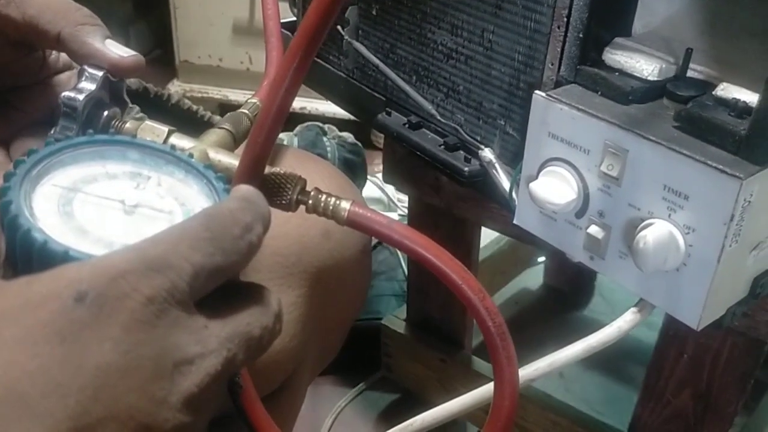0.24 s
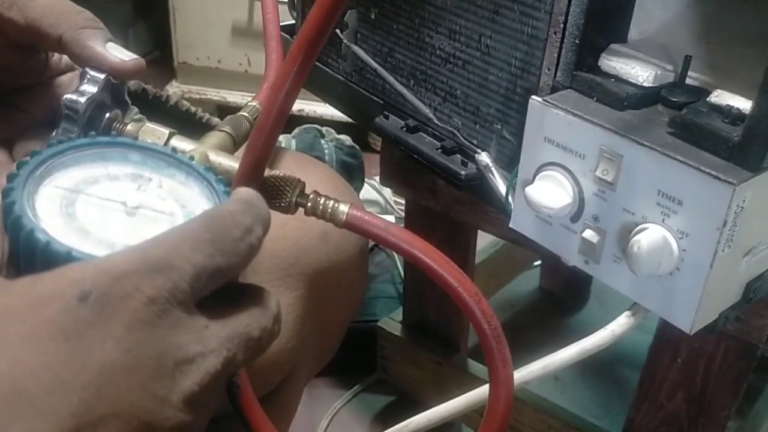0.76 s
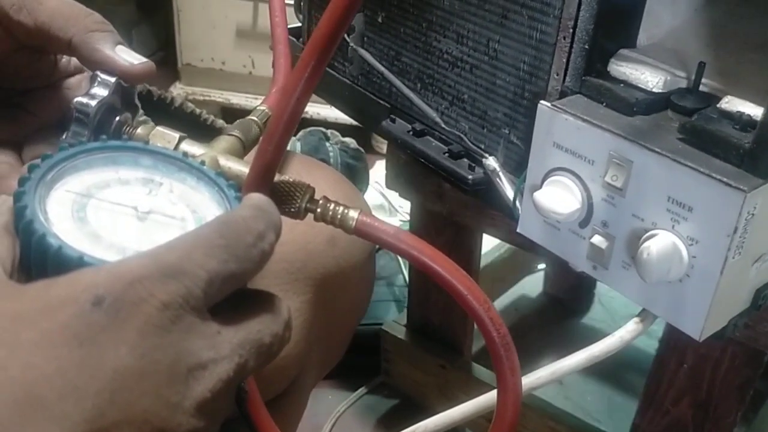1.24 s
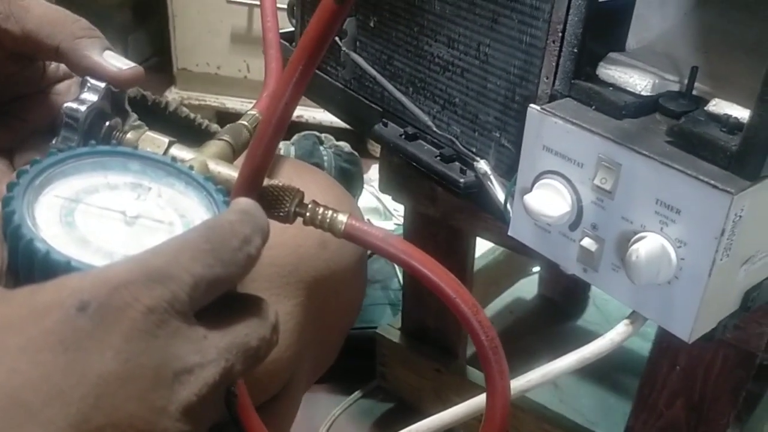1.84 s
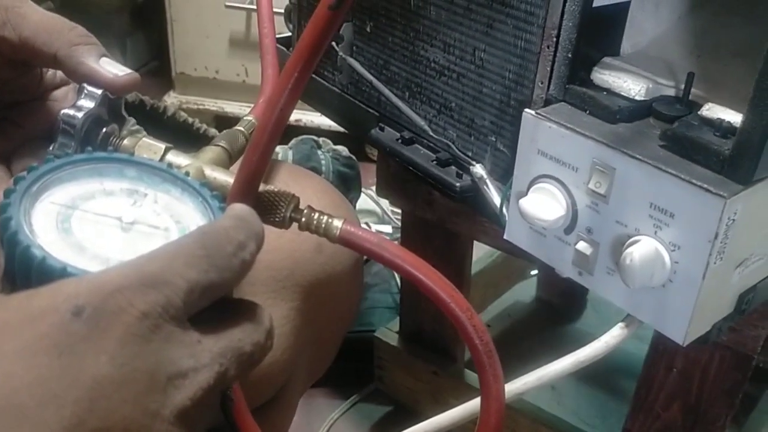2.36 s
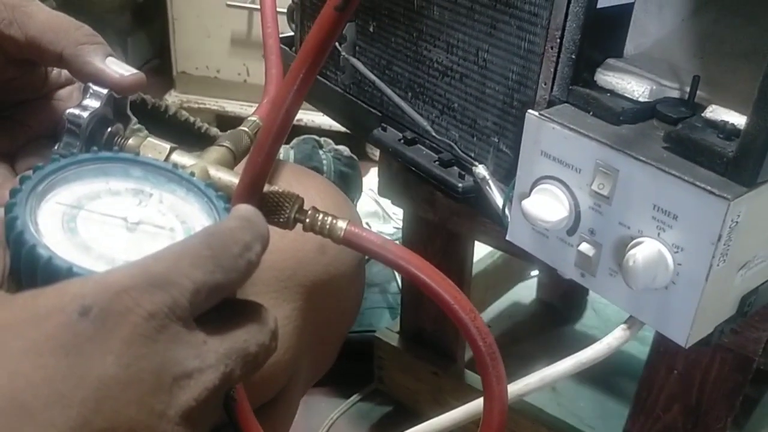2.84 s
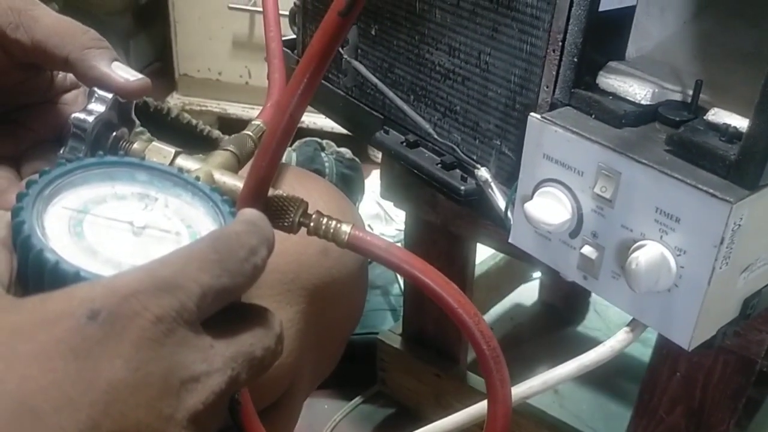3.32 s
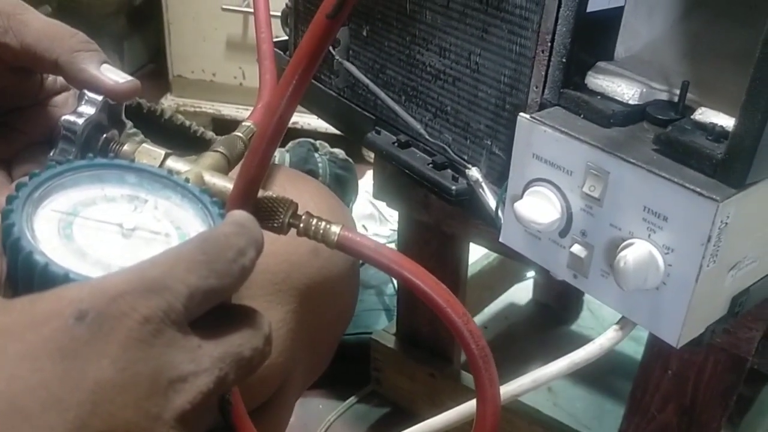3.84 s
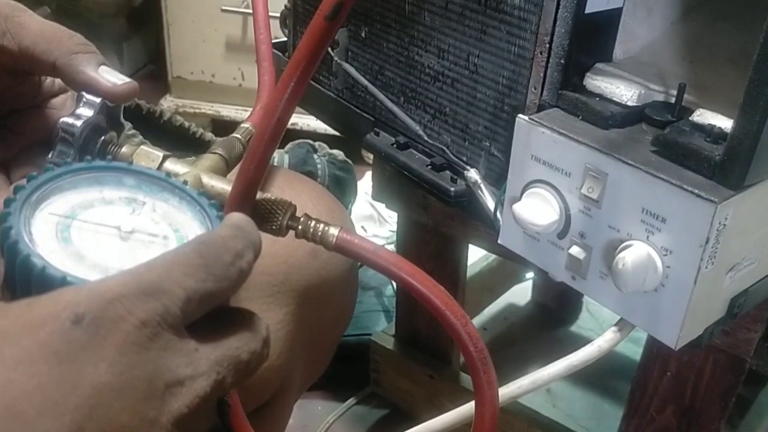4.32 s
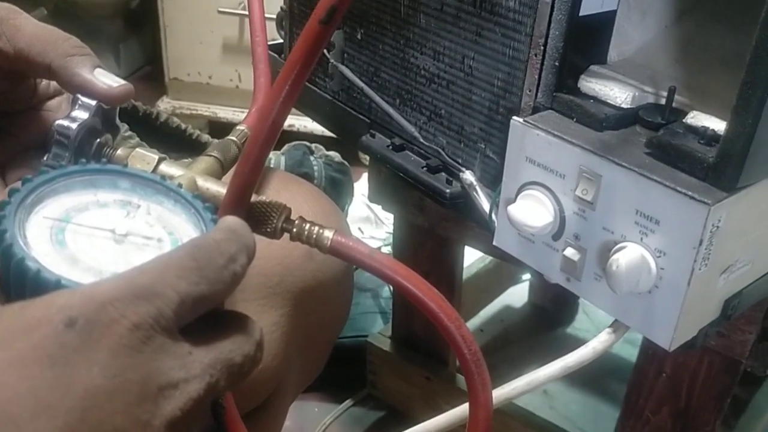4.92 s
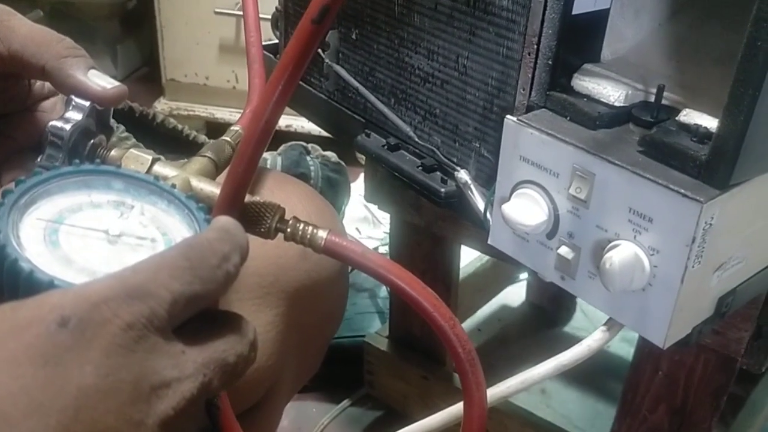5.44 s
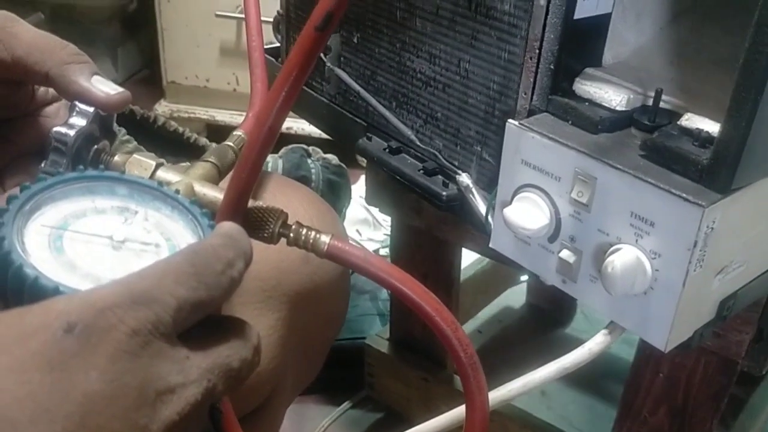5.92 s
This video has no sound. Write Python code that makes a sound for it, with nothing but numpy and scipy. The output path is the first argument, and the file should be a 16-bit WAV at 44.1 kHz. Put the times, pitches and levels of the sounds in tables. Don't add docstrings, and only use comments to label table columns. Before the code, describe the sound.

From 0 to about 6 seconds an opened-up air conditioner runs without a break in a room, a phone held near its fan. Low turbulent wind dominates: rumbling pushes, fluttering puffs and abrupt, slightly distorted pops, irregular and several a second. Strong hits come near 0.5, then a hard membrane snap at 0.7, with more around 1.5, 2.1, 2.3, 2.8, 3.4, 4.5, 4.7, 4.85, 5.9 and 6.1. The level dips for a moment after the hardest ones. Short lulls near 2.4, 3.6, 4.2, 5.4 and 6.0 uncover the machine: a steady, wavering compressor hum around 1 kHz with fainter higher tones, smooth rushing coil air, and thin refrigerant hiss with a very high sputtering whistle, sinking briefly near 3.7 and 4.3. Faint breathy fin whistles pass near 0.65, 1.8 and 5.4. It ends still running.

```python
import sys
import numpy as np
from scipy import signal
from scipy.fft import rfft, irfft
from scipy.io import wavfile
from scipy.ndimage import uniform_filter1d

SR = 44100
rng = np.random.default_rng(int(sys.argv[2]) if len(sys.argv) > 2 else 0)


def generate_wav(sig):
    pcm = np.round(np.clip(np.atleast_2d(sig).T, -1, 1) * 32767).astype(np.int16)
    wavfile.write(sys.argv[1], SR, pcm)


def voltage_ratio(decibels):
    exponent = np.asarray(decibels, float) / 20
    return 10 ** exponent


N = 272260
T = np.arange(N) / SR
SHAFT_HZ = 58.644


def evened(x):
    return x / np.sqrt(np.mean(x ** 2) + 1e-20)


def noise(points):
    hz = np.fft.rfftfreq(N, 1 / SR)
    f, db = np.transpose(points)
    shape = voltage_ratio(np.interp(np.log(hz + 1), np.log(f + 1), db, left=-99, right=-99))
    return evened(irfft(rfft(rng.standard_normal(N)) * shape, N))


def wander(hz):
    return noise([(.3, 0), (hz, 0), (3 * hz, -30)])


def humps(rows):
    return sum(db * np.exp(-((T - s) / (length / 2)) ** 2) for s, db, length in rows)


def resonate(x, hz, width):
    turn = np.exp(2j * np.pi * np.cumsum(hz * np.ones(N)) / SR)
    r = np.exp(-np.pi * width / SR)
    smooth = signal.lfilter([1], np.convolve([1, -r], [1, -r]), x / turn)
    return evened((turn * smooth).real)


# (frequency [Hz], density [dB per Hz])
PUSH_SPECTRUM = [(6, 4), (12, 4.5), (32, -0.5), (80, -0.5), (130, -15.5), (250, -59)]
# (frequency [Hz], density [dB per Hz])
FLUTTER_SPECTRUM = [(50, -42), (90, -1), (130, -3.5), (200, -9), (350, -22), (700, -35)]
# (centre [s], rise [dB], length [s])
DRAUGHT_SWELLS = [(.14, 1, 0.13), (.4, 5.5, 0.11), (.55, 15, 0.034), (.66, 5, 0.072), (1.23, 5, 0.087),
                  (1.68, 4.5, 0.078), (1.8, 6.5, .1), (2.2, 8.5, 0.091), (2.32, -1, .1), (2.42, 7, .08),
                  (2.72, 5.5, 0.17), (3.3, 6, 0.083), (3.57, 3, 0.13), (3.68, 5, 0.067), (4.14, 7, 0.12),
                  (4.31, 11, 0.037), (4.6, -0.5, 0.13), (5.67, 5.5, 0.052), (5.82, 7, 0.067),
                  (6.13, 5, 0.044)]


def draught(lumps_db):
    push_db, flutter_db, flutter_follows = -22, -24, 0.22
    swell_db = humps(DRAUGHT_SWELLS)
    push = evened(noise(PUSH_SPECTRUM) * voltage_ratio(lumps_db))
    flutter = evened(noise(FLUTTER_SPECTRUM) * voltage_ratio(3.55 * lumps_db))
    return push * voltage_ratio(push_db + swell_db) + flutter * voltage_ratio(flutter_db + flutter_follows * swell_db)


# (time [s], peak level [dB], 60 dB decay time [s])
EDDY_HITS = [(0.183, -7.5, 0.14), (0.464, -3, 0.088), (0.545, -20, 0.15), (0.754, -4.5, 0.048),
             (0.949, -7, 0.045), (0.813, -12, 0.054), (1.509, -1, 0.035), (1.744, -13.5, 0.14),
             (1.936, -6.5, 0.12), (2.131, 2, 0.029), (2.394, -15, 0.093), (2.515, 1.5, 0.025),
             (2.77, -1.5, 0.039), (2.833, -9, 0.057), (2.958, -10, 0.16), (3.008, -9.5, 0.14),
             (3.13, -12, 0.11), (3.408, -2, 0.063), (3.572, -13.5, 0.081), (4.399, -11.5, 0.094),
             (4.483, 6.5, 0.026), (4.594, -13, 0.17), (4.696, -2, 0.061), (4.78, -5.5, 0.058),
             (4.987, -15, 0.052), (5.302, -8.5, 0.068), (5.518, -12, 0.13), (5.648, -9, 0.13),
             (5.866, -12.5, 0.072), (6.112, -5.5, 0.15)]
# (frequency [Hz], density [dB per Hz])
EDDY_SPECTRUM = [(60, -57), (120, 2), (180, -1.5), (280, -7), (450, -16.5), (900, -43.5)]
# (frequency [Hz], density [dB per Hz])
EDGE_SPECTRUM = [(200, -60), (350, 1), (500, -6), (750, -7.5), (1200, -10.5), (2500, -47)]


def eddies(lumps_db):
    body_power, edge_power = np.zeros(N), np.zeros(N)
    for s, db, t60 in EDDY_HITS:
        at = round(s * SR)
        t = np.arange(min(8000, N - at)) / SR
        rise = 1 - np.exp(-t / 0.0033)
        decay = t / max(t60, .02)
        body_power[at:at + len(t)] += (rise * voltage_ratio(db - 0.5 - 60 * decay)) ** 2
        edge_power[at:at + len(t)] += (rise * voltage_ratio(db - 25 - 70 * decay)) ** 2
    small = voltage_ratio(np.minimum(3.5 * wander(hz=24.6) + 4.4 * lumps_db, 7) - 31.5)
    body = np.sqrt(body_power + small ** 2) * noise(EDDY_SPECTRUM)
    edge = np.sqrt(edge_power + (0.13 * small) ** 2) * noise(EDGE_SPECTRUM)
    return body + edge


# (centre [s], fall [dB], length [s])
AIR_LULLS = [(.02, 4, 0.14), (1.36, 4, 0.084), (2.25, 7.5, .08), (2.37, 11, 0.058), (2.59, 1, 0.13),
             (3.63, 6.5, 0.08), (3.95, 6, 0.14), (4.25, 6, 0.16), (4.67, 7.5, 0.052), (4.92, 4, 0.17),
             (5.14, 2.5, 0.047), (5.39, 5.5, 0.14), (5.57, 6, 0.062), (5.99, 9, 0.071)]


def lull_gain():
    return voltage_ratio(-humps(AIR_LULLS))


def vortex(core_ms):
    ms = np.arange(-1000, 1001) / SR * 1000
    return np.tanh(ms / core_ms) * np.exp(-np.hypot(ms, core_ms) / 4)


# (time [s], signed pressure swing [full scale], core time [ms])
STRONG_VORTICES = [(0.203, 0.41, 0.69), (0.4692, 0.42, 1.5), (0.4913, 0.35, 1.1), (0.5501, 0.49, 0.3),
                   (0.7069, -0.5, 0.5), (0.9502, 0.34, 0.45), (1.057, 0.3, 0.47), (1.642, 0.41, 0.92),
                   (1.9483, 0.36, 0.4), (1.9672, 0.28, 0.52), (2.1375, 0.55, 0.55), (2.3105, 0.7, 1.5),
                   (2.5181, 0.32, 0.52), (2.776, 0.48, 0.92), (3.256, 0.33, 0.64), (3.413, 0.31, 0.56),
                   (3.5772, 0.35, 0.53), (3.6717, 0.37, 0.61), (3.726, 0.4, 0.55), (4.0664, 0.31, 0.67),
                   (4.4883, 0.23, 0.46), (4.5267, 0.47, 1.3), (4.6214, -0.42, 1.3), (4.6987, 0.47, 0.58),
                   (4.813, 0.35, 0.58), (4.846, 0.35, 0.67), (4.9924, 0.35, 0.56), (5.9340, 0.53, 0.55),
                   (6.114, 0.41, 0.99), (6.13, 0.31, 0.61)]


def vortices():
    strong = np.zeros(N + 2001)
    for s, swing, core_ms in STRONG_VORTICES:
        strong[round(s * SR):][:2001] += 1.3 * swing * vortex(1.1 * max(core_ms, .45))
    arrives = rng.random(N) < 36 / SR
    weak = arrives * voltage_ratio(4.56 * np.minimum(rng.exponential(1, N), 2.2) - 21)
    weak = signal.oaconvolve(weak * lull_gain(), vortex(core_ms=0.92), "same")
    return strong[1000:N + 1000] + weak


def calm():
    s = np.transpose(STRONG_VORTICES)[0]
    marks = np.bincount(np.round(s * SR).astype(int), minlength=N)[:N]
    passing = signal.oaconvolve(marks, np.hanning(800), "same")
    return 1 - .72 * np.minimum(passing, 1)


# (time [s], peak level [dB], ring frequency [Hz])
MEMBRANE_SNAPS = [
    (0.6914, -29, 1560),
]


def snaps():
    out, t = np.zeros(N), np.arange(-100, 600) / SR
    jolt = 10.0 * np.exp(-(t / 0.00038) ** 2)
    body = np.cos(2 * np.pi * 600 * t) * np.exp(-((t - .002) / 0.0016) ** 2)
    late = np.exp(-((t - .0018) / .0009) ** 2)
    for s, db, hz in MEMBRANE_SNAPS:
        ring = 0.43 * np.sin(2 * np.pi * 2350 * t) + 0.45 * np.cos(2 * np.pi * hz * t)
        out[round(s * SR) - 100:][:len(t)] -= voltage_ratio(db) * (jolt + body + ring * late)
    return out


# (multiple of the shaft speed, level [dB rms])
SHELL_TONES = [(13, -58), (14, -58), (16, -52), (17, -48.5), (18, -58.5), (19, -45.5), (20, -95), (21, -62),
               (23, -63.5), (24, -62.5), (25, -68), (26, -62), (27, -62), (28, -75), (29, -69), (30, -62.5),
               (31, -87), (32, -65.5), (33, -66.5), (35, -69), (38, -69.5), (40, -67.5), (43, -61),
               (44, -69), (45, -72), (46, -64.5), (47, -63), (48, -73), (51, -66.5), (52, -78)]


def compressor():
    drift, tremble = wander(hz=0.74), wander(hz=30.5)
    out = np.zeros(N)
    for order, db in SHELL_TONES:
        phase = 2 * np.pi * (order * SHAFT_HZ * T + rng.random()) + 0.032 * order * drift
        own_drift = 0.82 * np.roll(drift, int(order) * 74001)
        own_tremble = 0.88 * np.roll(tremble, int(order) * 4001)
        out += np.sqrt(2) * voltage_ratio(db + own_drift + own_tremble) * np.sin(phase)
    return out


# (frequency [Hz], density [dB per Hz])
RUSH_SPECTRUM = [(300, -20), (550, -3.5), (900, -3.5), (1300, -14.5), (1550, -9.5), (2150, -16.5),
                 (2650, -16), (3250, -19.5), (4250, -16.5), (6000, -23.5), (8300, -19), (10300, -22.5),
                 (13400, -23.5)]


def fan():
    rush_db = -44.5
    beat = 1 + 0.04 * np.cos(4 * np.pi * SHAFT_HZ * T)
    return voltage_ratio(rush_db + 0.85 * wander(hz=8)) * beat * noise(RUSH_SPECTRUM)


def sputter():
    hz = 9.5
    return noise([(1.5, -8), (.7 * hz, -3), (hz, 0), (2.5 * hz, -12), (40, -30)])


# (centre [s], fall [dB], length [s])
VALVE_CHOKES = [
    (.15, 1, 0.44),
    (.75, 3, .15),
    (2.75, -2, .1),
    (3.73, 4, 0.12),
    (4.3, 4, .25),
    (5.8, 1, 0.37),
    (6.1, 4, .15),
]


def valve():
    hiss_db, whistle_db, sputter_db = -56, -59, 2
    hiss_hz = 8330 + 200 * wander(hz=4.9)
    whistle_hz = 12080 + 30 * wander(hz=2.7)
    hiss = resonate(rng.standard_normal(N), hiss_hz, width=830)
    whistle = resonate(rng.standard_normal(N), whistle_hz, width=270)
    hiss *= voltage_ratio(hiss_db + 1.5 * wander(hz=28) + 1.24 * wander(hz=12))
    unsteady_db = sputter_db * sputter() + 1.9 * wander(hz=29)
    whistle *= voltage_ratio(whistle_db - humps(VALVE_CHOKES) + unsteady_db)
    return hiss + whistle


# (time [s], length [s], start [Hz], end [Hz], level [dB rms])
FIN_WHISTLES = [(1.68, .07, 1060, 1060, -52), (1.80, .2, 900, 875, -48), (1.79, .07, 5980, 5960, -66),
                (1.08, .06, 4350, 4380, -62), (3.62, .05, 2460, 2470, -58), (3.92, .08, 2480, 2460, -57),
                (4.28, .08, 1050, 1040, -50), (5.39, .2, 1070, 930, -49), (.655, .05, 620, 720, -42),
                (.8, .1, 650, 640, -50), (5.96, .12, 700, 690, -51)]


def fins():
    out, breath, waver = np.zeros(N), wander(hz=30), wander(hz=40)
    for s, length, start_hz, end_hz, db in FIN_WHISTLES:
        at, count = round(s * SR), round(length * SR)
        hz = np.linspace(start_hz, end_hz, count) + 14 * waver[at:at + count]
        swell = np.hanning(count) ** .5 * voltage_ratio(db + 5.5 + 3 * breath[at:at + count])
        out[at:at + count] += swell * np.sin(2 * np.pi * np.cumsum(hz) / SR)
    return out


def flecks():
    orders, hop = np.arange(53, 110), 512
    slow = uniform_filter1d(rng.standard_normal((N // hop + 1, len(orders))), size=5, axis=0)
    levels = voltage_ratio(6 * evened(slow) - 82 - .12 * (orders - orders[0]))
    times = np.arange(len(slow)) * hop / SR
    out = np.zeros(N)
    for order, level in zip(orders, levels.T):
        out += np.interp(T, times, level) * np.sin(2 * np.pi * order * SHAFT_HZ * T)
    return out


def scene():
    lumps_db = wander(hz=17.6)
    turbulence = draught(lumps_db) + eddies(lumps_db)
    wind = lull_gain() * calm() * turbulence + vortices() + snaps()
    mono = wind + compressor() + fan() + valve() + fins() + flecks()
    return np.array([mono, mono])


# (time [s], dip [dB])
GAIN_DIPS = [
    (0.549, 2),
    (0.701, 3.5),
    (1.55, 1.5),
    (2.13, 3.5),
    (2.77, 1.5),
    (3.018, 3.5),
    (3.41, 0.5),
    (4.7, 2.5),
    (4.849, 4.5),
    (5.9, 2),
]


def ducking_db():
    duck_s, recover_s = 0.011, 0.058
    times, dips = np.transpose(GAIN_DIPS)
    since = np.maximum(T - times[:, None], 0)
    shape = 2.0 * (1 - np.exp(-since / duck_s)) * np.exp(-since / recover_s)
    return -dips @ shape


SPREAD_BANDS = [4220, 4650, 5170, 5680, 6290, 6890, 7580, 8270, 8960, 9650, 10340, 11020, 11710, 12240,
                13100]


def separate_highs(mono):
    frames = dict(fs=SR, nperseg=1024, noverlap=768)
    hz, _, z = signal.stft(mono, **frames)
    band, count = np.searchsorted(SPREAD_BANDS, hz), len(SPREAD_BANDS) + 1
    chance = uniform_filter1d(rng.standard_normal((z.shape[1], count)), size=7, axis=0)
    bar = np.where((hz < 5170) | (hz > 11710), .05, -.75)[:, None]
    inside = (band > 0) & (band < count - 1)
    apart = (evened(chance).T[band] > bar) & inside[:, None]
    power = np.array([np.mean(abs(z[band == b]) ** 2, 0) for b in range(count)])
    white = signal.stft(rng.standard_normal((2, N)), **frames)[2]
    flat = np.sqrt(power[band]) * white / np.sqrt(np.mean(abs(white) ** 2))
    spread = np.where(apart, voltage_ratio(-1.2) * flat + 0.35 * z, z)
    return signal.istft(spread, **frames)[1][:, :N]


def roll_off(x):
    return signal.sosfilt(signal.butter(12, 13460, fs=SR, output="sos"), x)


def record(dry):
    x = dry[0] * voltage_ratio(0.05 + ducking_db())
    ceiling = .49
    x = x / (1 + abs(x / ceiling) ** 6) ** (1 / 6)
    edge = signal.firwin(1023, 13060, window=("kaiser", 8), fs=SR)
    x = signal.oaconvolve(separate_highs(x), edge[None], "same")
    return roll_off(x)


dry = scene()
out = record(dry)
generate_wav(out)
```